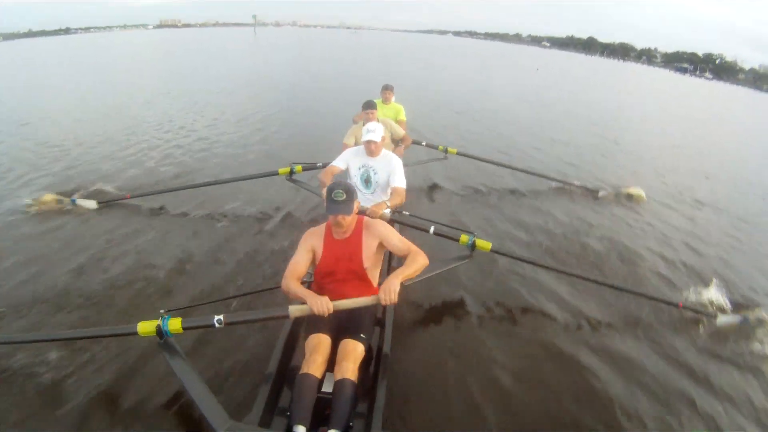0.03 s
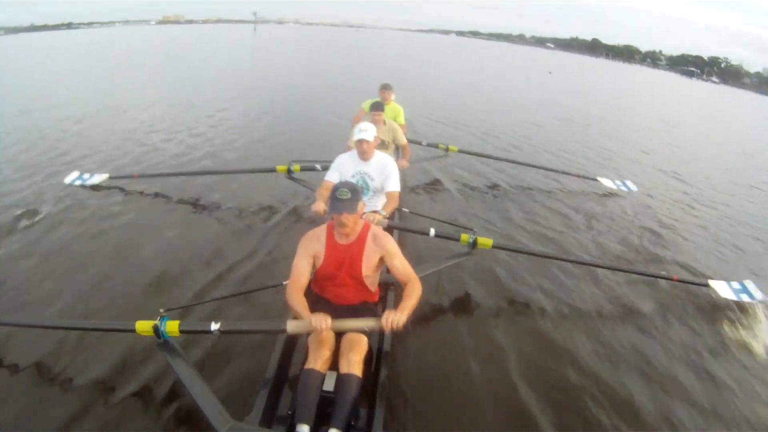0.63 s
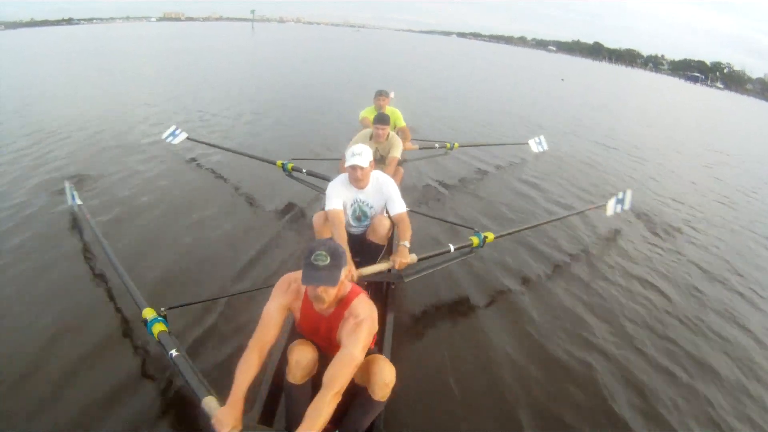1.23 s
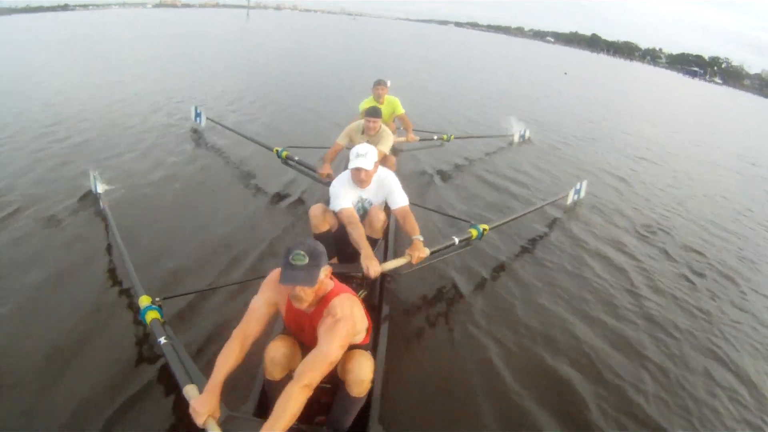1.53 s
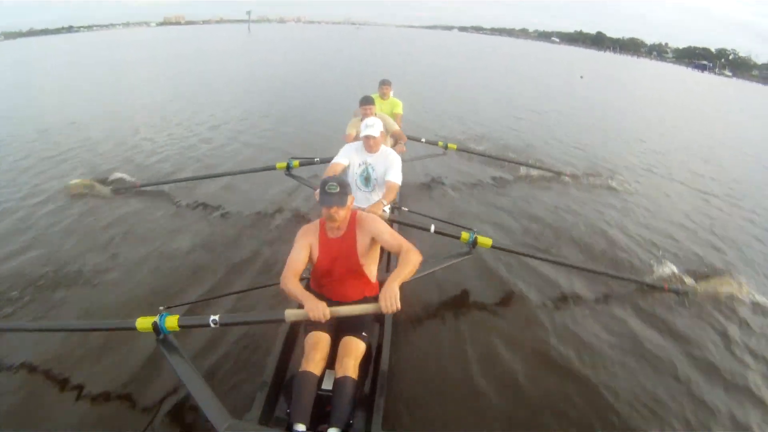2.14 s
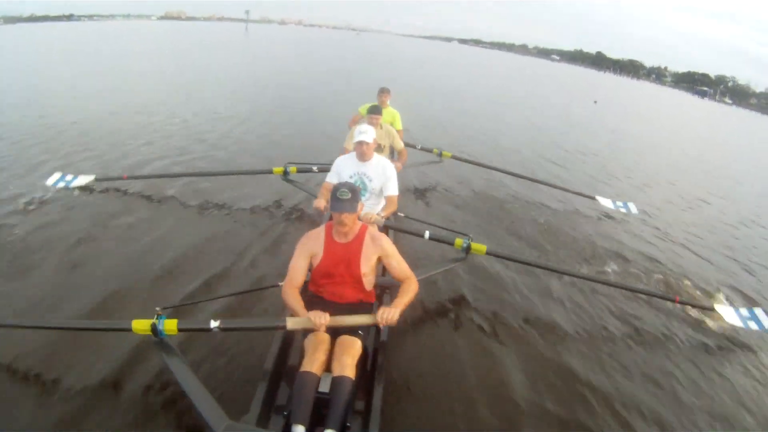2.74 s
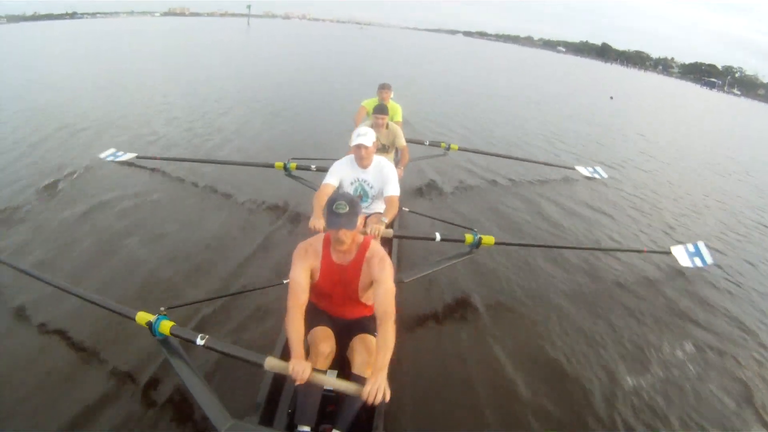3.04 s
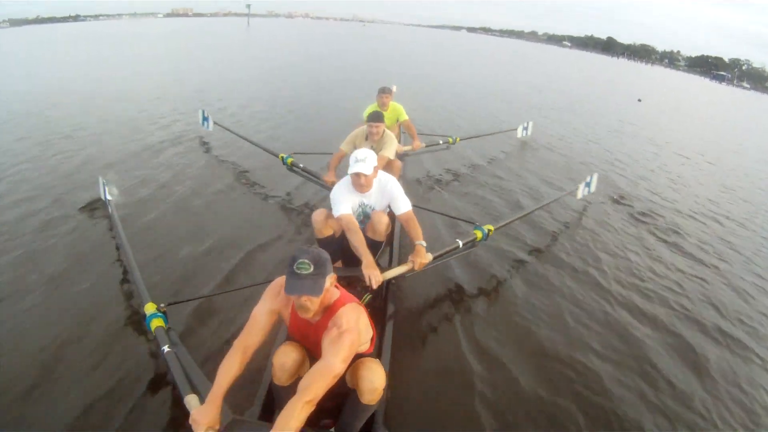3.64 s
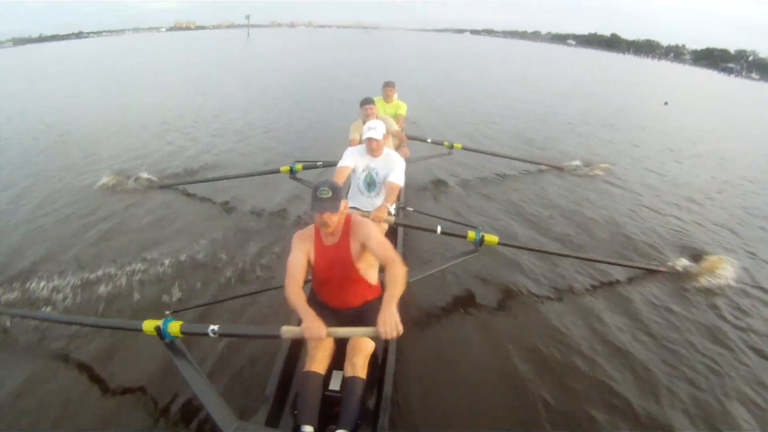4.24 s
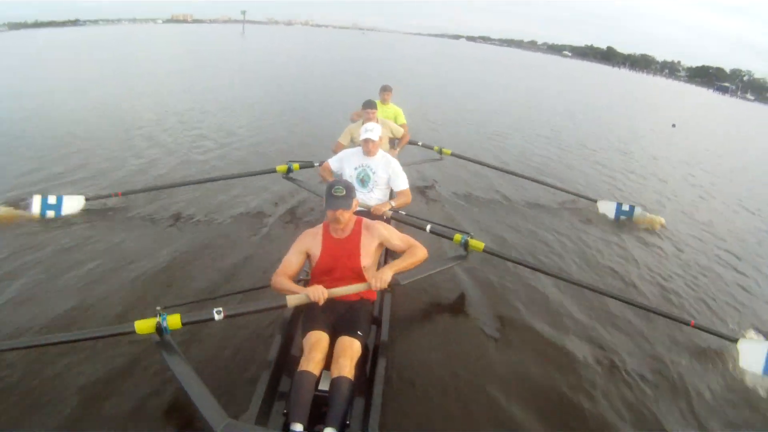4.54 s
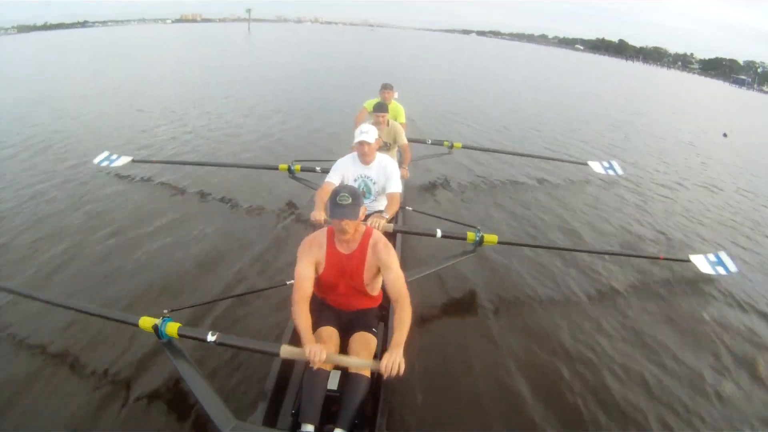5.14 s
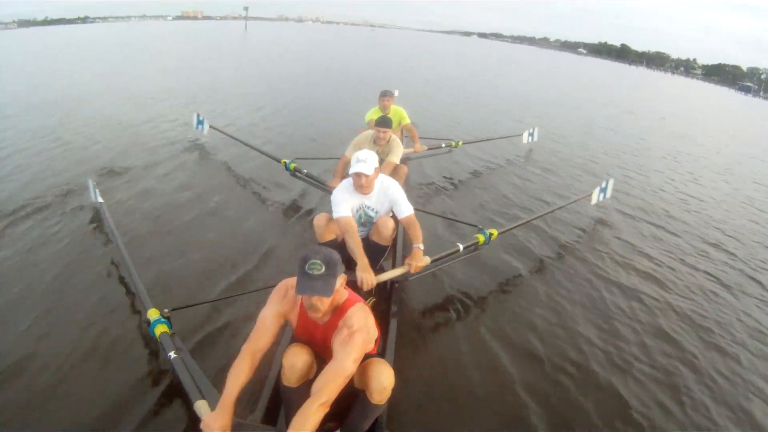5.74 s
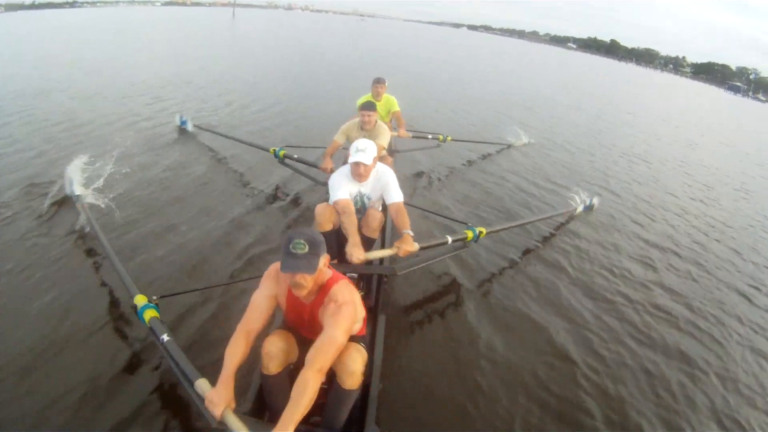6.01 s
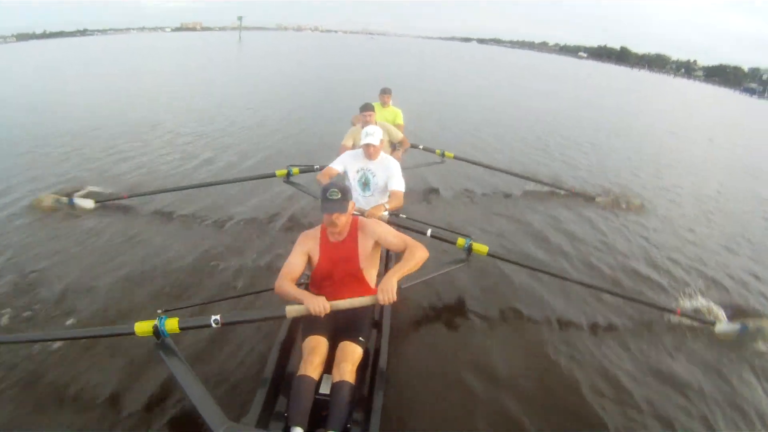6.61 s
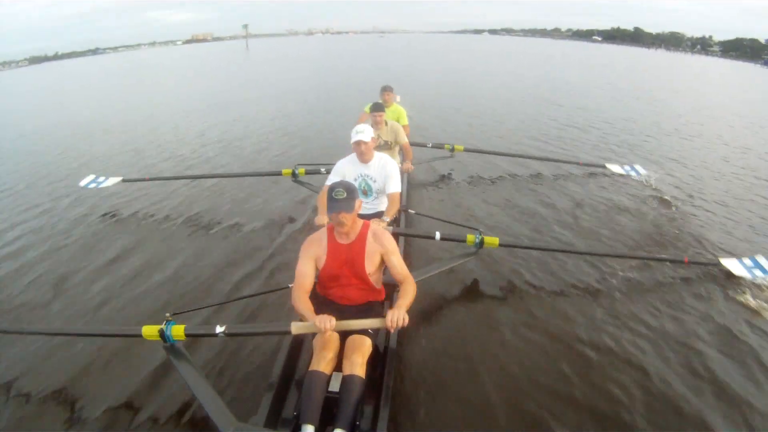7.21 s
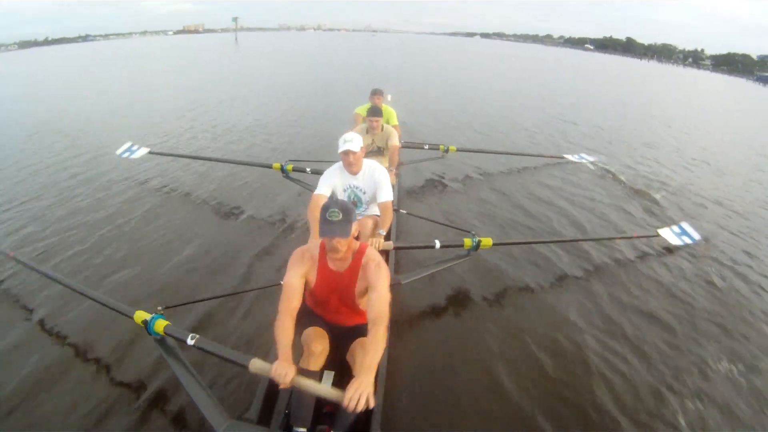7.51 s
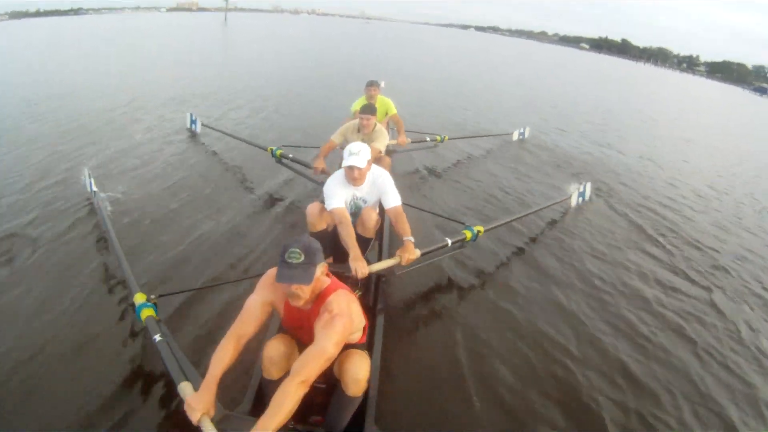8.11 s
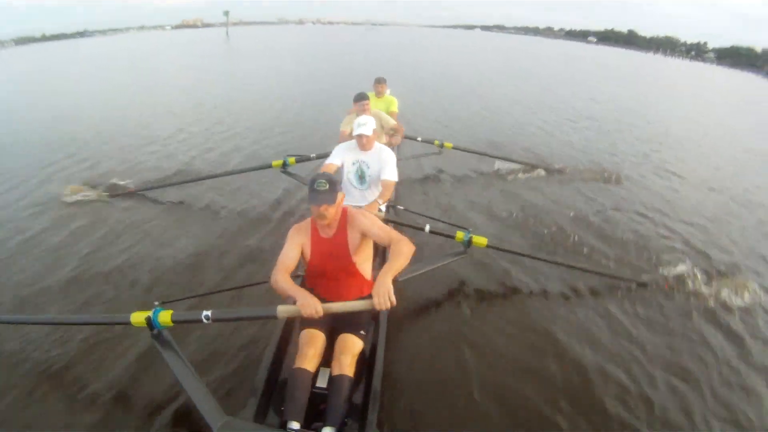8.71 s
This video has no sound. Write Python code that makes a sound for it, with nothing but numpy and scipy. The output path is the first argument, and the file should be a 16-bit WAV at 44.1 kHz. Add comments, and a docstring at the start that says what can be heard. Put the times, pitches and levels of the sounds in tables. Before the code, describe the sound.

A racing boat rows four strokes on open water. About every two seconds the oars knock hard in their oarlocks as the blades come out, and the hull booms and shakes with a dry crackle. Lighter knocks follow as the blades go in. A low rush of seat wheels and water swells twice each stroke. Everything sounds close and muffled, carried through the hull to a microphone in a sealed case.

```python
"""Oars clunk in their oarlocks as a four-oared racing boat rows four strokes on calm water.
They knock hard at each finish (blades out) and more lightly at each catch (blades in).
The hull booms and shakes, with a dry crackle. A rush of seat wheels and water swells twice each
stroke as the crew slides. It is all heard through the hull, from inside a sealed case."""
import sys
import numpy as np
from scipy import signal
from scipy.fft import rfft, irfft
from scipy.io import wavfile
from scipy.ndimage import uniform_filter1d

SR = 44100
rng = np.random.default_rng(int(sys.argv[2]) if len(sys.argv) > 2 else 0)


def log_audio(samples):
    """Write samples as a 16-bit WAV file to the path given in sys.argv[1]."""
    # one column per channel
    frames = np.atleast_2d(samples).T
    # limit to full scale, then quantise
    limited = np.clip(frames, -1, 1)
    pcm = np.round(limited * 32767).astype(np.int16)
    wavfile.write(sys.argv[1], SR, pcm)


N = 386316


def from_db(db):
    """Turn decibels into a gain to multiply by."""
    return 10 ** (np.asarray(db) / 20)


def rms_one(x):
    """Scale a sound so its average level (rms) is 1."""
    return x / np.sqrt(np.mean(x ** 2) + 1e-20)


def steady(x, span_s):
    """Even out the level over a short span; rms 1."""
    power = uniform_filter1d(x ** 2, max(int(span_s * SR), 2))
    return x / np.sqrt(np.abs(power) + 1e-20)


def together(*gains):
    """Unrelated pushes add in power."""
    return np.sqrt(sum(gain ** 2 for gain in gains))


def add(track, start_s, sound):
    """Mix a sound into a track."""
    i = int(start_s * SR)
    track[i:i + len(sound)] += sound[:N - i]


def swells(starts, db, rise_db_per_s, hold_s, fall_db_per_s):
    """A gain that rises up to each start time, holds, then dies away."""
    t, level = np.arange(N) / SR, np.full(N, -200.)
    for start, top, hold, fall in np.broadcast(starts, db, hold_s, fall_db_per_s):
        before, after = np.maximum(start - t, 0), np.maximum(t - start - hold, 0)
        level = np.maximum(level, top - rise_db_per_s * before - fall * after)
    return from_db(level)


def coloured(x, spectrum):
    """Shape a sound's lows and highs by (pitch_hz, level_db) points, falling away past the ends."""
    hz, db = np.transpose(spectrum)
    log_hz = np.log(np.arange(N // 2 + 1) * SR / N + 1)
    beyond = np.abs(log_hz - np.clip(log_hz, np.log(hz[0]), np.log(hz[-1])))
    return irfft(rfft(x) * from_db(np.interp(log_hz, np.log(hz), db) - 99 * beyond), N)


def ring(push, hz, ring_s):
    """A push sets one tone ringing; it fades by 60 dB in ring_s."""
    decay, angle = from_db(-60 / (ring_s * SR)), 2 * np.pi * hz / SR
    return signal.lfilter([0, np.sin(angle)], [1, -2 * decay * np.cos(angle), decay ** 2], push + 1e-18)


def shaken(tones, skirt):
    """Random forces keep tones ringing; a larger skirt spreads the force wider around each; rms 1."""
    out = 0
    for hz, width, db in tones:
        spread = 1 + skirt * width / hz
        band = signal.butter(2, [hz / spread, hz * spread], "band", fs=SR, output="sos")
        force = signal.sosfilt(band, rng.standard_normal(N + SR))
        tone = ring(force, hz, ring_s=np.log(1000) / (np.pi * width))[SR:]
        out = out + from_db(db) * steady(tone, span_s=0.4)
    return rms_one(out)


# The strokes; the first is already under way. Levels in all tables are relative.
# finish_s, catch_s, sway_db, sway_fade_db_per_s, boom_db, boom_fade_db_per_s,
# catch_boom_db, crackle_length_s, catch_crackle_db
STROKES = [(-1.93, -0.65, -21, 18, -18, 36, -20, 0.35, -45),
           (0.336, 1.545, -18.2, 4.5, -19, 22, -15.5, 0.47, -40),
           (2.527, 3.79, -18.7, 12, -15.5, 42, -14.5, 0.41, -45),
           (4.685, 5.925, -17.2, 25, -16.5, 40, -17.5, 0.37, -52),
           (6.901, 8.12, -16.7, 18, -19.5, 13, -14.5, 0.35, -40)]
RECOVERY_AT_S, DRIVE_AT_S = 0.91, 1.55   # time after the finish


def crew_speed():
    """The crew slides up to the catch (the recovery), then pushes back with the legs (the drive)."""
    t = np.arange(N) / SR
    finish, catch, *_ = np.transpose(STROKES)[:, :, None]

    def hump(middle_s, width_s):
        return np.exp(-.5 * ((t - middle_s) / width_s) ** 2)

    recovery = hump(finish + RECOVERY_AT_S, width_s=0.285)
    drive = from_db(1.0) * hump(finish + DRIVE_AT_S, width_s=0.19)
    turning = 1 - 0.3 * hump(catch, width_s=0.07)   # the seats slow as they turn round
    return (np.maximum(recovery, drive) * turning).max(axis=0)


def bubbling(per_s, size_db, wash):
    """Tiny bubbles and slaps of uneven size over a smooth hiss."""
    sizes = from_db(size_db * np.minimum(rng.exponential(1, N), 4)) * rng.choice([-1, 1], N)
    pops = sizes * (rng.random(N) < per_s / SR)
    return rms_one(pops) + wash * rng.standard_normal(N)


def plops(count, size_db, cycles, rise):
    """Larger bubbles come at random and ring briefly, each rising from its own pitch; rms 1."""
    out, t = np.zeros(N), np.arange(SR // 12) / SR
    for when, pitch, size in rng.random((count, 3)):
        hz = 620 * 4 ** pitch
        age = t * hz / cycles
        tone = np.sin(2 * np.pi * hz * t * (1 + rise * age))
        add(out, when * N / SR, from_db(size_db * size ** 3 - 60 * age) * tone / hz)
    return rms_one(out)


# The low rush of seat wheels and water, and the high fizz of spray: pitch_hz, level_db
RUSH_COLOUR = [(300, -27.5), (450, -42), (510, -13), (570, -3.5), (635, 3.5), (780, -0.5), (880, 1),
               (975, -13.5), (1070, -4), (1200, -16), (1400, -15.5), (1520, -21), (1800, -27),
               (2600, -22.5)]
FIZZ_COLOUR = [(1300, -8.5), (1750, -13.5), (1950, -11), (2200, -1), (2380, 1.5), (2500, -9.5),
               (2660, -5.5), (2800, -20), (3050, -15.5), (4000, -16), (5000, -21), (5900, -26)]


def wheels_and_water(speed, rush_db, drawn_db, rest_db, fizz_db, splash_db, drip_db, plop_db):
    """A rush of seat wheels and water through the hull swells twice each stroke as the crew slides."""
    finish, catch, *_ = np.transpose(STROKES)
    # the blades nearing the finish
    drawn = swells(finish - 0.25, drawn_db, rise_db_per_s=40, hold_s=0.3, fall_db_per_s=110)
    rush_gain = together(speed * from_db(rush_db), drawn, from_db(rest_db))
    # spray falls back after the blades go in, and runs off them after they come out
    splash = swells(catch + 0.19, splash_db, rise_db_per_s=170, hold_s=0.05, fall_db_per_s=45)
    drips = swells(finish + 0.3, drip_db, rise_db_per_s=15, hold_s=0.5, fall_db_per_s=40)
    fizz_gain = together(splash, drips, from_db(fizz_db))
    rush = rms_one(coloured(bubbling(per_s=1400, size_db=2.0, wash=0.92), RUSH_COLOUR))
    fizz = rms_one(coloured(bubbling(per_s=900, size_db=5.0, wash=1.0), FIZZ_COLOUR))
    bubbles = from_db(plop_db) * plops(count=1100, size_db=4.5, cycles=60, rise=0.089)
    return rush_gain * (rush + bubbles) + fizz_gain * fizz


# Low tones of the deck: pitch_hz, width_hz, level_db
DECK_TONES = [(205.7, 22, -2), (241.4, 40, -7.5), (300, 12.5, 3.5), (364, 11.5, 0.5), (384.7, 9.3, -5.5),
              (480, 81, -12.5)]


def deck_rumble(speed, rolling_db, rest_db, finish_rumble_db, catch_rumble_db, lead_s):
    """A low rumble follows the seats, swelling just before each finish as the oars turn and at the catch."""
    finish, catch, *_ = np.transpose(STROKES)
    oars_turn = swells(finish - lead_s, finish_rumble_db, rise_db_per_s=110, hold_s=0.16,
                       fall_db_per_s=110)
    at_catch = swells(catch - lead_s, catch_rumble_db, rise_db_per_s=90, hold_s=0.13, fall_db_per_s=150)
    gain = together(speed * from_db(rolling_db), oars_turn, at_catch, from_db(rest_db))
    return gain * shaken(DECK_TONES, skirt=5.1)


# The sharpest ticks of the crackle: start_s, level_db
SHARP_TICKS = [(0.379, -39), (0.6424, -39), (0.6767, -42), (0.7357, -41), (0.8516, -37), (0.9099, -41),
               (1.0613, -44), (1.121, -38), (1.544, -43), (2.9551, -42), (3.8987, -39), (4.7228, -39),
               (4.939, -40.5), (4.9952, -39.5), (5.9635, -44), (6.8904, -41), (7.1893, -44), (8.145, -41)]
# The bright sound of a tick: pitch_hz, level_db
TICK_COLOUR = [(1600, -9.5), (2150, 12), (2500, 1), (2950, -5), (3500, 0), (5000, -4.5), (6000, -23.5),
               (7000, -7.5), (8500, -7.5), (9700, -11.5), (10500, -20.5), (15000, -23.5)]


def crackle(shake, level_db, scatter_db, tick_db, tick_s):
    """Dry ticks come at the tips of the hull's swings after each finish and catch; a few stand out."""
    finish, catch, *_, length_s, catch_db = np.transpose(STROKES)
    blades_out = swells(finish, level_db, rise_db_per_s=500, hold_s=length_s, fall_db_per_s=250)
    first_in = swells(catch + 0.01, catch_db, rise_db_per_s=900, hold_s=0.025, fall_db_per_s=900)
    last_in = swells(catch + 0.085, catch_db, rise_db_per_s=900, hold_s=0.035, fall_db_per_s=400)
    strain = together(blades_out, first_in, last_in)
    swing = np.abs(steady(shake, span_s=0.45))
    tips = signal.find_peaks(swing, distance=SR // 250)[0]
    force = np.zeros(N)
    force[tips] = (strain * swing)[tips] * from_db(scatter_db * rng.uniform(-1, 1, len(tips)))
    for start_s, db in SHARP_TICKS:
        force[int(start_s * SR)] += from_db(db + tick_db)
    # each tick is a tiny burst of fading noise
    bursts = signal.lfilter([1], [1, -np.exp(-1 / (tick_s * SR))], force + 1e-18)
    return coloured(bursts * rng.standard_normal(N), TICK_COLOUR)


# The hull's very deep sway and its boom just above: pitch_hz, width_hz, level_db
SWAY_TONES = [(34.14, 3.7, -1.5), (51.1, 13, -2.5)]
BOOM_TONES = [(76.13, 6.9, 0), (122.6, 7.5, -9.5)]


def hull(speed, catch_sway_db, rest_sway_db, rest_boom_db, sliding_boom_db, lag_s, top_hz=140):
    """The long thin hull bends as the crew works, shaking after each finish and again from the catch."""
    finish, catch, sway_db, sway_fade, boom_db, boom_fade, catch_db, _, _ = np.transpose(STROKES)
    # once in the water, the blades calm the shake from the last finish
    free = swells(finish, 0, rise_db_per_s=20, hold_s=catch - finish, fall_db_per_s=45)
    finish_sway = swells(finish + lag_s, sway_db, rise_db_per_s=55, hold_s=0.06, fall_db_per_s=sway_fade)
    until_drive_s = finish + DRIVE_AT_S - catch
    catch_sway = swells(catch, catch_sway_db, rise_db_per_s=50, hold_s=until_drive_s, fall_db_per_s=75)
    sway_gain = together(free * finish_sway, catch_sway, from_db(rest_sway_db))
    finish_boom = swells(finish + lag_s, boom_db, rise_db_per_s=100, hold_s=0.04, fall_db_per_s=boom_fade)
    catch_boom = swells(catch, catch_db, rise_db_per_s=90, hold_s=0.08, fall_db_per_s=84)
    sliding_boom = speed * from_db(sliding_boom_db)
    boom_gain = together(free * finish_boom, catch_boom, sliding_boom, from_db(rest_boom_db))
    sway = sway_gain * steady(shaken(SWAY_TONES, skirt=1.3), span_s=0.12)
    boom = boom_gain * steady(shaken(BOOM_TONES, skirt=1.8), span_s=0.14)
    # bending is slow, so only the bass is kept
    return signal.sosfiltfilt(signal.butter(6, top_hz, fs=SR, output="sos"), sway + boom)


def struck(tones, chatter_s, scatter_db=2.0, detune=0.0073):
    """One blow: loose parts chatter briefly, ringing each tone with its own strength; peak rms 1."""
    t = np.arange(SR // 6) / SR
    pressure = t ** 2 * np.exp(-t / chatter_s)
    out = 0
    for hz, db, ring_s in tones:
        push = (rng.random(len(t)) - .5) * pressure
        # the load on the rigger shifts each pitch a little from blow to blow
        tone = ring(push, hz * (1 + detune * rng.standard_normal()), ring_s)
        out = out + from_db(db + scatter_db * rng.standard_normal()) * tone / np.abs(tone).max()
    return out / np.sqrt(uniform_filter1d(out ** 2, size=SR // 70).max())


# Blows of the oars in the oarlocks: start_s, level_db, hardness_db (more knock, less clunk),
# collar_db (more clack), weight_db (more hull)
OAR_BLOWS = [(0.158, -43, -9, -8, 8), (0.286, -39, 4, -18, 0), (0.325, -25, -5, -4, -9),
             (0.336, -16, 9, -12, -10), (0.348, -19, 6, -13, -2), (0.374, -23, 0, -6, -1),
             (0.404, -42, 0, -8, 8), (0.655, -35.5, -9, -9, 6), (1.086, -34, 0, -12, -9),
             (1.364, -32.5, -3, -13, -12), (1.502, -35, -4, -14, -12), (1.536, -32, -3, -10, 0),
             (1.603, -36, 6, -12, 1), (1.644, -33.5, -2, -8, -4), (1.756, -33, 5, -14, -17),
             (1.854, -30, -7, -20, -20), (2.376, -35.5, -7, -18, -1), (2.464, -40.5, 14, -1, -2),
             (2.527, -17, 7, -7, -9), (2.538, -18, 1, -11, -4), (2.572, -31.5, -5, -6, 3),
             (2.618, -38, -4, -3, -2), (2.659, -35, -10, -8, -1), (2.935, -45, 10, -1, -7),
             (3.673, -36, -6, -19, -3), (3.919, -35, 9, -11, -11), (4.542, -38, -5, -15, 6),
             (4.683, -18.5, 0, -11, -4), (4.695, -24.5, -4, -7, 3), (4.709, -27, 10, -4, -1),
             (4.729, -25.5, 1, -3, 2), (4.771, -35, 1, -6, 1), (4.813, -37, -2, -10, 5),
             (5.482, -32.5, 7, -22, -10), (5.938, -33, 3, -8, -6), (5.955, -32, -4, -6, 0),
             (6.075, -31.5, 2, -6, -6), (6.118, -22.5, -1, -18, -9), (6.395, -34, 11, -10, -14),
             (6.845, -36, 12, -10, -8), (6.888, -31, 0, -6, -1), (6.899, -14.5, 6, -13, -11),
             (6.949, -35, 6, -3, 6), (6.99, -34, 5, -3, 0), (7.018, -29.5, -3, -12, 1),
             (8.002, -35.5, -5, -8, 6), (8.077, -30, -9, -14, -2), (8.102, -21, 14, -10, -5),
             (8.215, -32, 2, -20, -14), (8.284, -36, -6, -20, -13), (8.325, -28.5, -1, -8, -1),
             (8.449, -38, 14, -2, -4)]
# What rings after a blow: pitch_hz, level_db, ring_s
KNOCK_TONES = [(779, 1.5, 0.062), (873, 0.5, 0.068), (920, -6, 0.11), (995, -6, 0.046), (1063, -12.5, 0.13)]   # the rigger (the arm holding the oarlock), hull and case
CLUNK_TONES = [(593.6, 5.5, 0.084), (681.2, -0.5, 0.13)]   # the hollow oarlock
CLACK_TONES = [(1335, 3.5, 0.07), (1367, 4.5, 0.084), (1578, 2.5, 0.046), (1627, 7, 0.041),
               (1789, -4.5, .08), (1961, -6, 0.12), (2080, 3.5, 0.024), (2186, 1.5, 0.083),
               (2296, -1.5, 0.075), (2560, -7.5, 0.066)]   # the collar round the oar
BODY_TONES = [(200, -1, 0.14), (235, -0.5, 0.089), (309.6, -1.5, 0.24), (348, 5.5, 0.14), (395, -2.5, 0.14)]   # the hull's low ring


def oarlocks(knock_db, clunk_db, clack_db, body_db, thump_db, thump_ring_s, hull_lag, ceiling):
    """Each blow knocks the rigger, clunks the oarlock, clacks the collar and thumps into the hull."""
    out = np.zeros(N)
    thump_tones = [(hz, 0, thump_ring_s) for hz, _, _ in BOOM_TONES]
    for start_s, db, hardness_db, collar_db, weight_db in OAR_BLOWS:
        chatter_s = 0.0022 * from_db(0.2 * weight_db)   # heavier blows chatter longer
        add(out, start_s, from_db(db + hardness_db / 2 + knock_db) * struck(KNOCK_TONES, chatter_s))
        add(out, start_s, from_db(db - hardness_db / 2 + clunk_db) * struck(CLUNK_TONES, chatter_s))
        add(out, start_s, from_db(db + collar_db + clack_db) * struck(CLACK_TONES, chatter_s))
        slow_s = chatter_s * hull_lag   # the heavy hull takes up the blow more slowly
        add(out, start_s, from_db(db + weight_db + body_db) * struck(BODY_TONES, slow_s))
        add(out, start_s, from_db(db + weight_db + thump_db) * struck(thump_tones, slow_s))
    out = ceiling * np.tanh(out / ceiling)   # round off the hardest blows
    # boat and case pass little between the body and clunk tones, and little treble
    out = signal.lfilter(*signal.iirnotch(478, Q=2.3, fs=SR), out)
    return signal.sosfilt(signal.butter(10, 2870, fs=SR, output="sos"), out)


def sample_and_hold(x, rate_hz=12000):
    """A slow converter holds each sample, adding a faint, high mirror image of the sound."""
    slow = signal.resample_poly(x, rate_hz, SR)
    return signal.resample_poly(np.repeat(slow, 4), SR, 4 * rate_hz)[:N]


def scene():
    """Everything reaches one microphone through the boat; open water gives no echo."""
    speed = crew_speed()
    shake = hull(speed, catch_sway_db=-23.5, rest_sway_db=-41, rest_boom_db=-40,
                 sliding_boom_db=-34.5, lag_s=0.04)
    knocks = oarlocks(knock_db=0.5, clunk_db=2.0, clack_db=-0.5, body_db=-2.3, thump_db=5.3,
                      thump_ring_s=0.13, hull_lag=1.94, ceiling=0.65)
    rumble = deck_rumble(speed, rolling_db=-44, rest_db=-51, finish_rumble_db=-40,
                         catch_rumble_db=-43, lead_s=0.12)
    rush = wheels_and_water(speed, rush_db=-33.5, drawn_db=-46.2, rest_db=-57, fizz_db=-60,
                            splash_db=-55, drip_db=-59.5, plop_db=-10)
    ticks = crackle(shake, level_db=-41.5, scatter_db=5, tick_db=10, tick_s=0.0011)
    return (sample_and_hold(shake + knocks + rumble + rush) + ticks)[None]


def record(dry):
    """Cut the very highest treble."""
    return signal.sosfilt(signal.ellip(10, .2, 80, 15300, fs=SR, output="sos"), dry)


dry = scene()
out = record(dry)
log_audio(out)
```